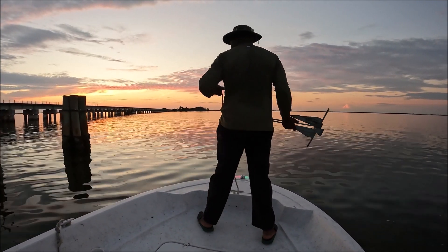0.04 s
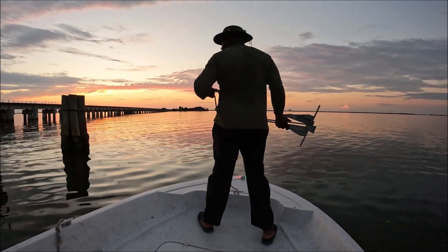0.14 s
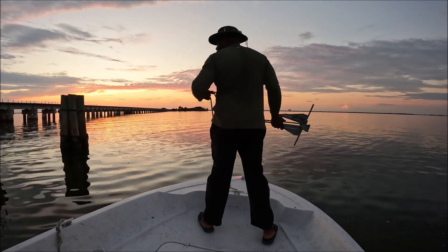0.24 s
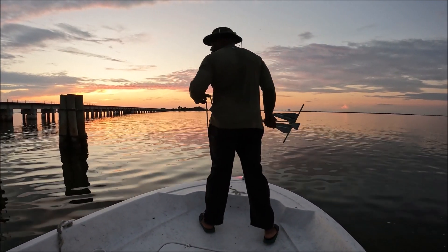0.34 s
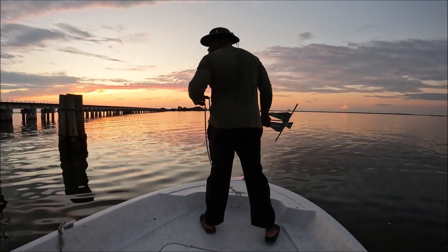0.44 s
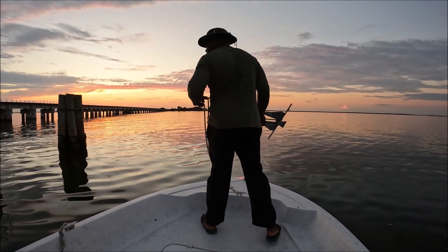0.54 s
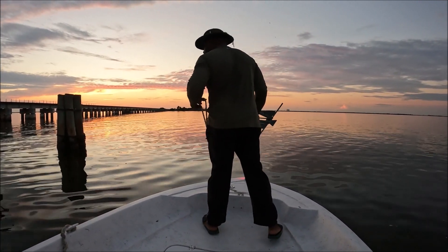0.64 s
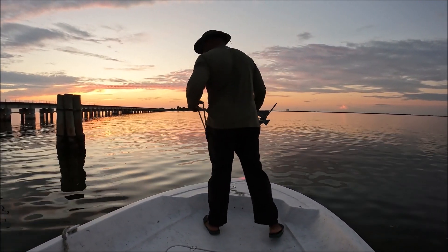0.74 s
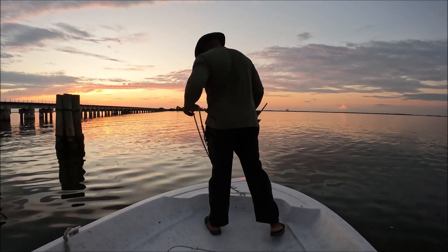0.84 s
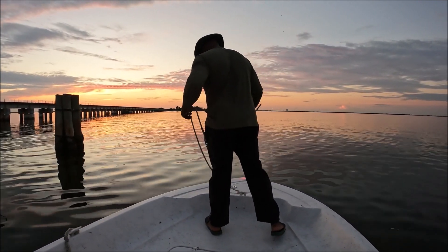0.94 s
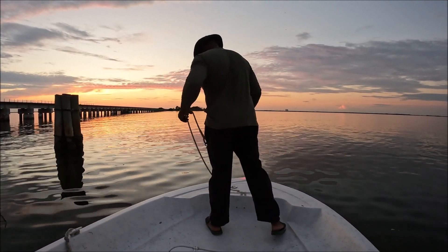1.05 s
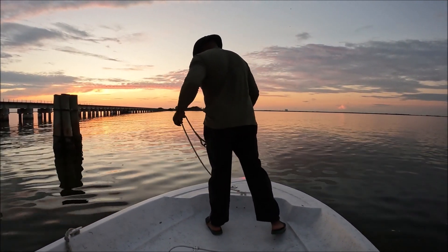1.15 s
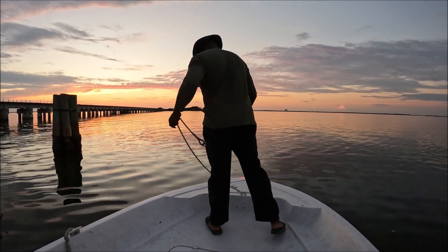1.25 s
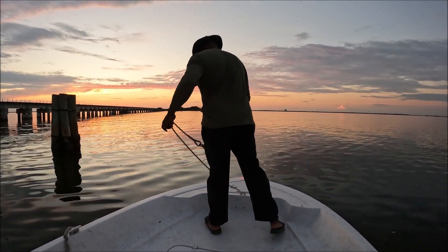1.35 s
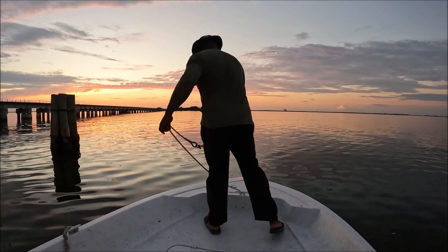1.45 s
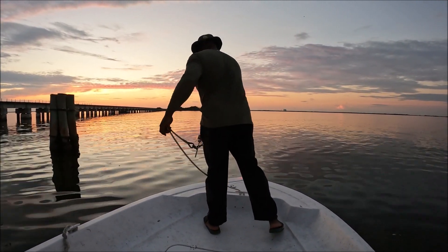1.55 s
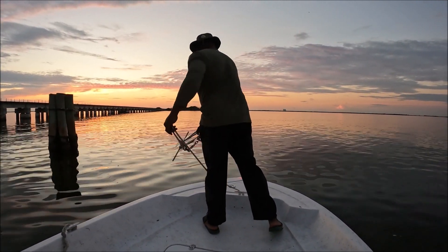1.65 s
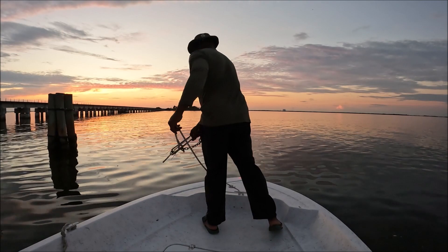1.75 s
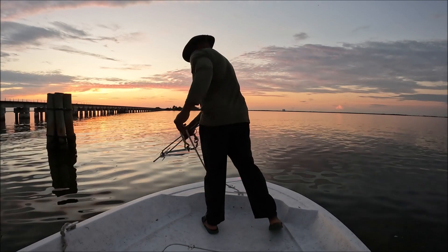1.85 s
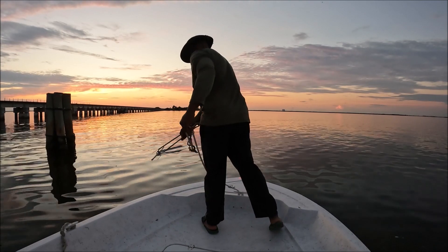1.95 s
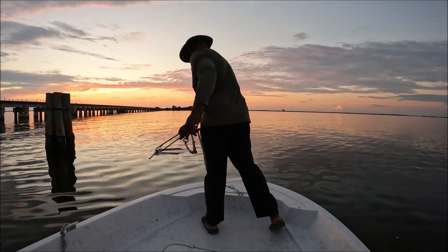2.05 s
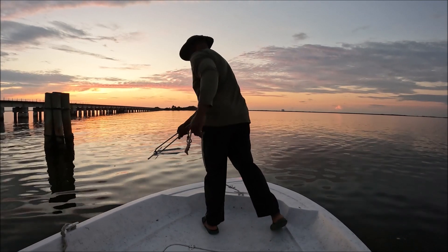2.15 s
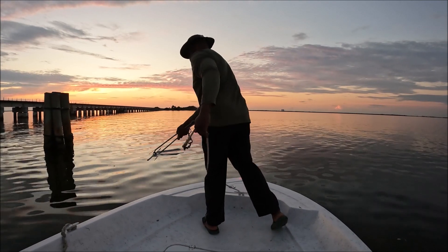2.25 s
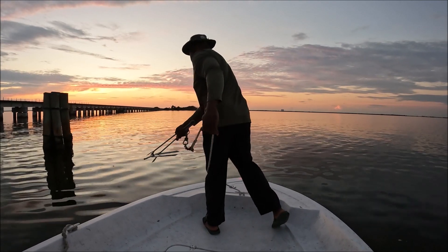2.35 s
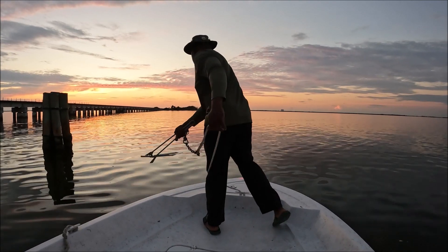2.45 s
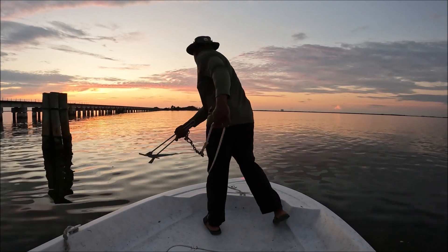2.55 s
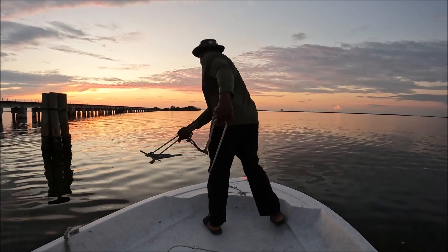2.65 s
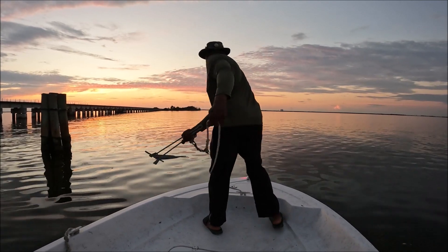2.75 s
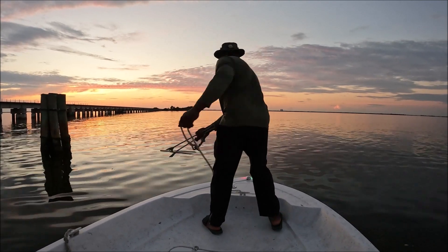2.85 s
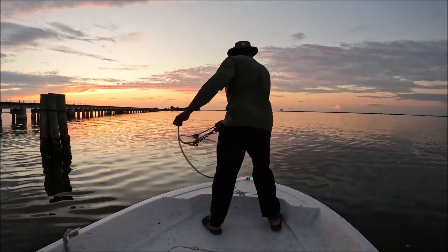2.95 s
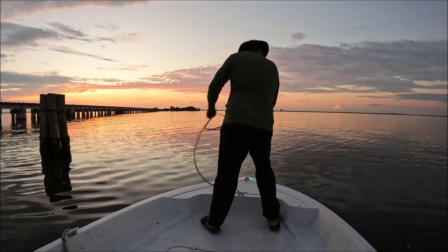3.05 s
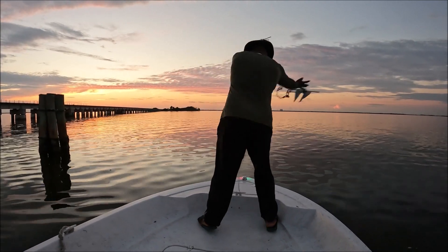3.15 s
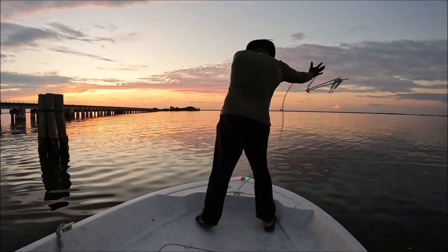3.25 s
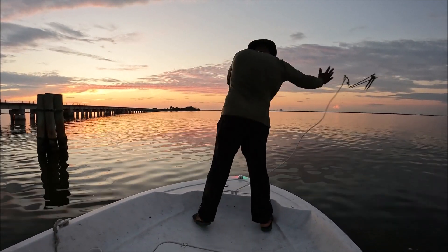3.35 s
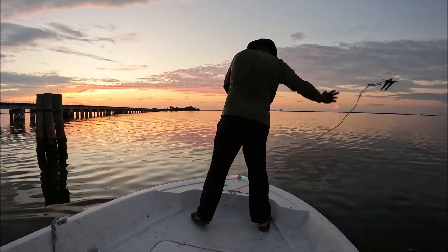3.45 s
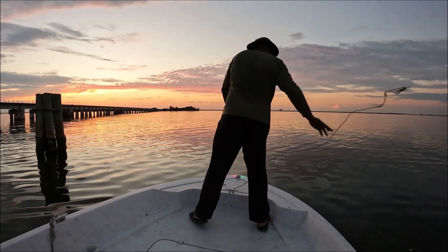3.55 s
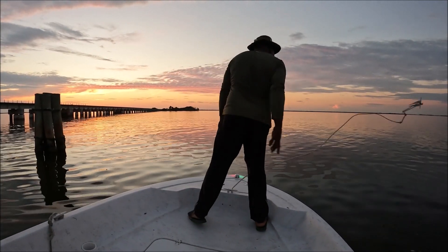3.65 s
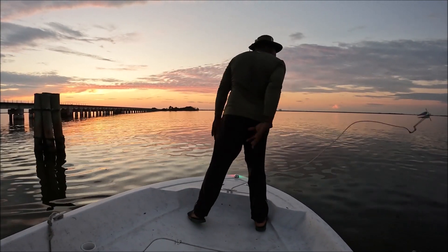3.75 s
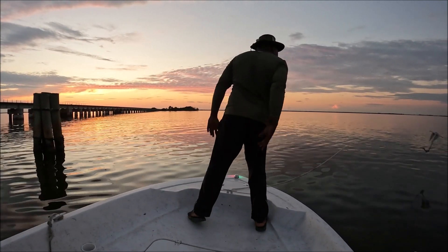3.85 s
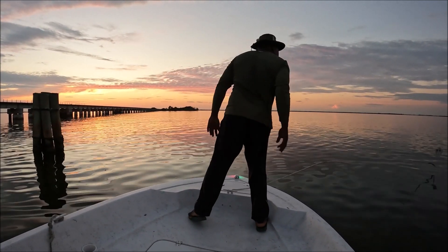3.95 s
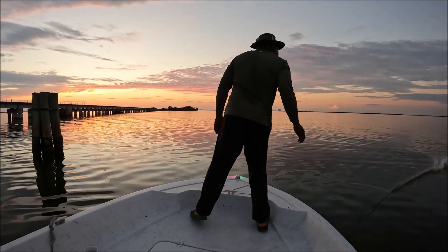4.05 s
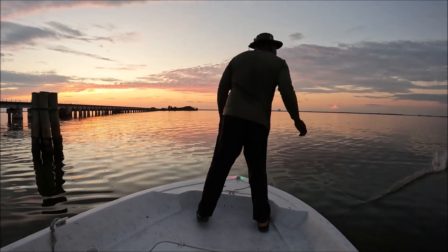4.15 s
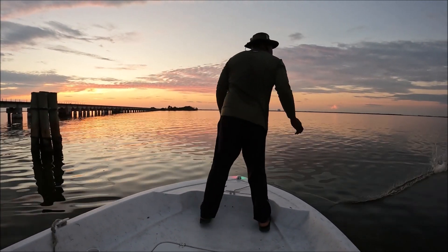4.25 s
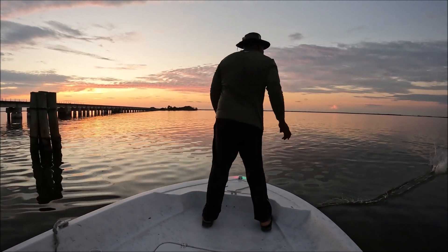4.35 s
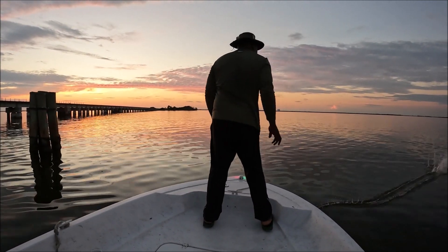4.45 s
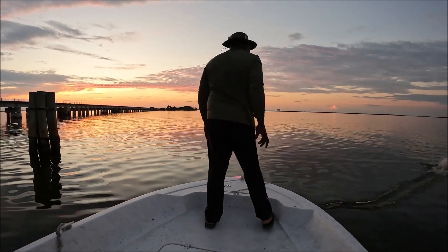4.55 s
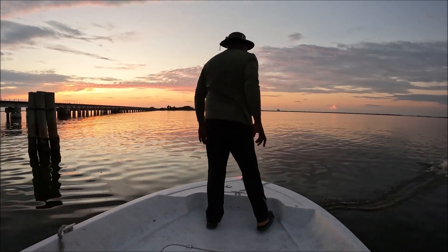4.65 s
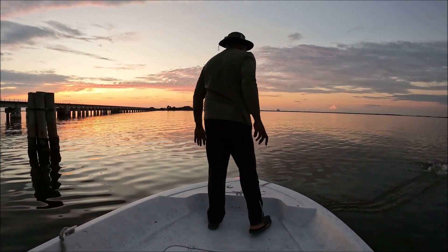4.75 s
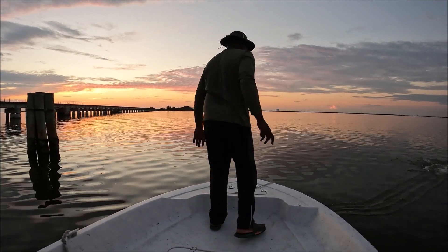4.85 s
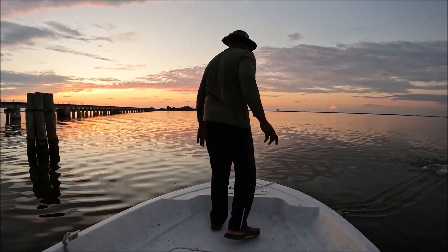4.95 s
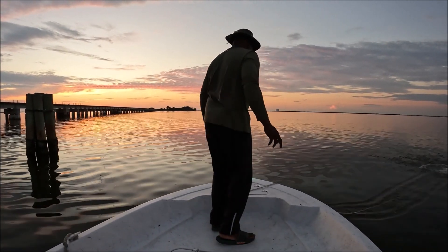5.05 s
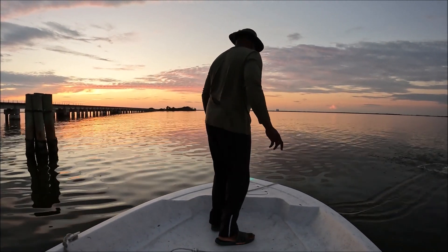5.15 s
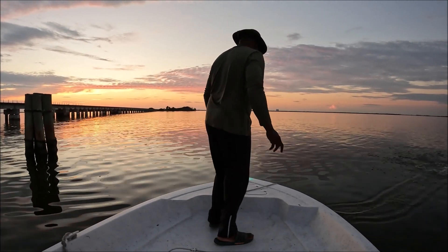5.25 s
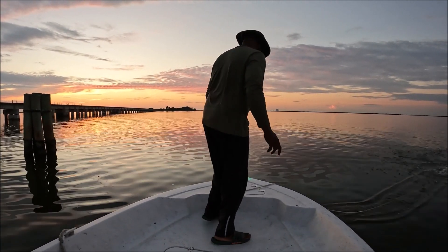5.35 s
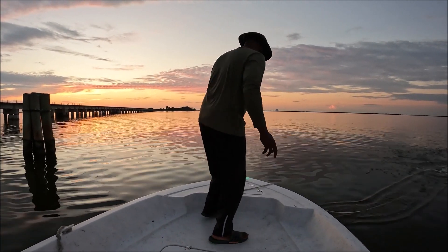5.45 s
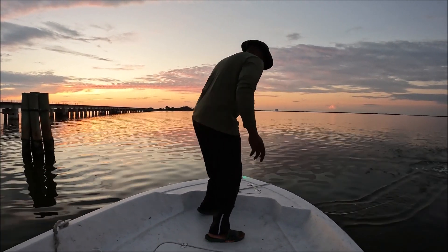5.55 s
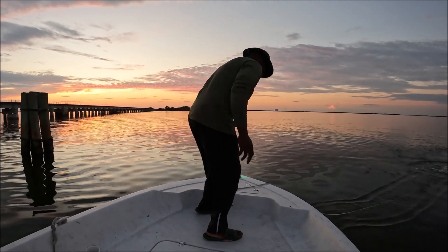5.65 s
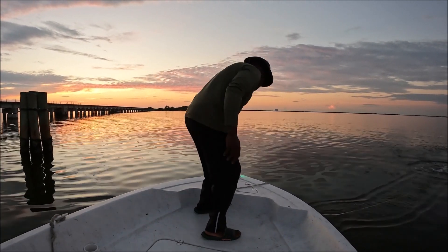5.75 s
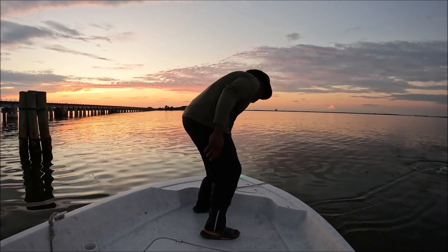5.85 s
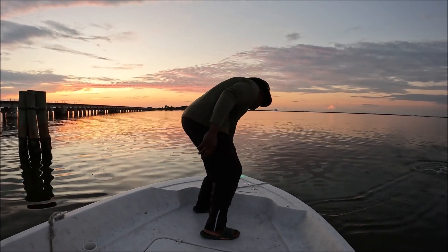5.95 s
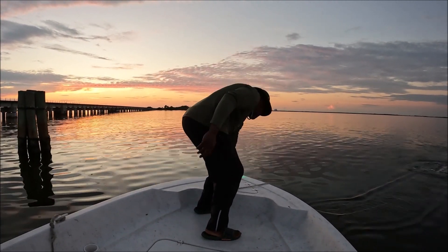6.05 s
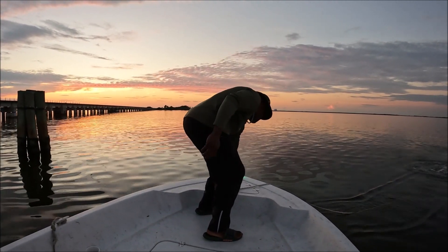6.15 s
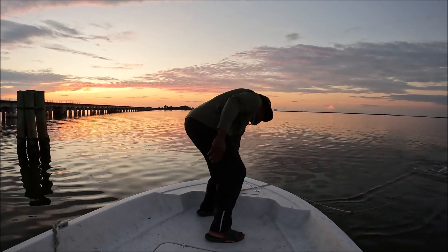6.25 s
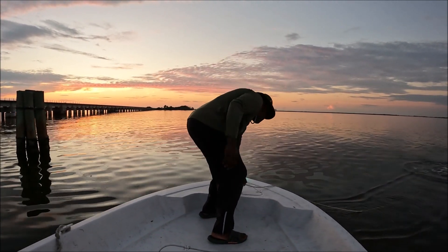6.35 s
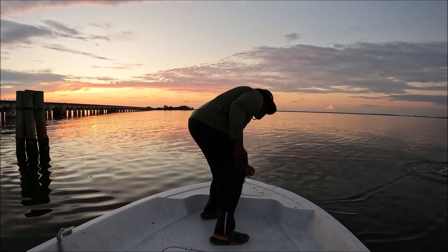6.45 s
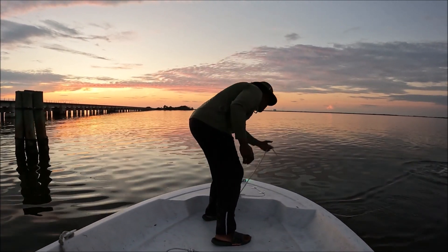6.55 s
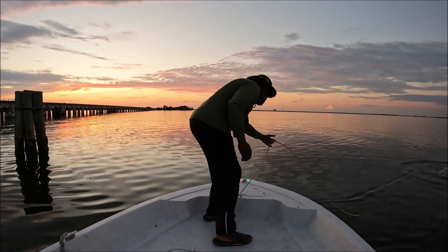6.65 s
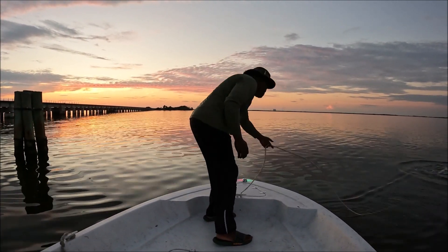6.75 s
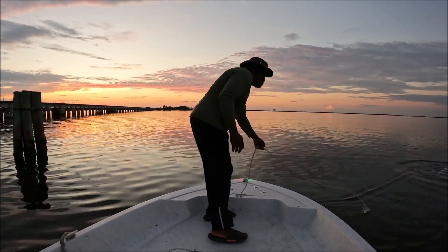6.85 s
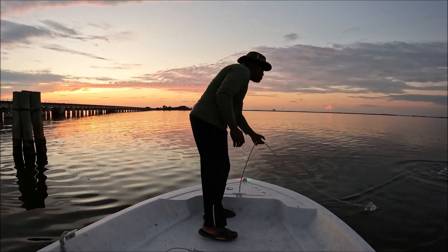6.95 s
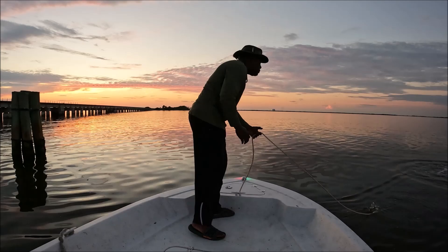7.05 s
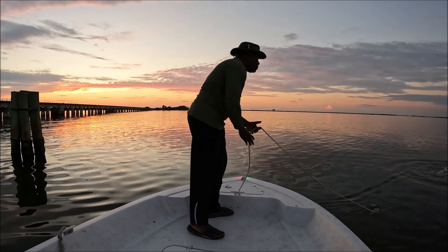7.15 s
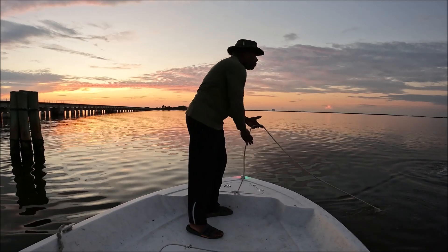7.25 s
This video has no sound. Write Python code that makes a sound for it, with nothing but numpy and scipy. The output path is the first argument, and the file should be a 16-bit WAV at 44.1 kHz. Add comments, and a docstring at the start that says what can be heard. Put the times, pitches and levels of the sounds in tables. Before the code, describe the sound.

An outboard motor idles over a low rumble and faint hiss on a calm bay. A crow caws twice far off. Nearby, rope swishes softly and chain clanks against a steel anchor. The chain jingles as it is thrown, with feet and line thumping the hollow deck, then the anchor splashes in. Spray patters back and the water settles, leaving a few soft knocks and small splashes.

```python
"""An anchor and its chain, thrown by a man from the bow of a small fibreglass boat, plunge into calm water.
The chain clanks on the flukes and jingles in flight as rattling contacts ring the steel; feet and line
thump the hollow deck. The splash is clouds of ringing bubbles, then spray raining back, and at the end
the lifted line flicks the water. Behind it the outboard's firing harmonics hum at idle over a low
rumble and the hiss of the bay, and a crow caws twice far off."""
import sys
import numpy as np
from scipy import signal
from scipy.fft import rfft, irfft, next_fast_len
from scipy.io import wavfile
from scipy.ndimage import map_coordinates

SR = 44100
rng = np.random.default_rng(int(sys.argv[2]) if len(sys.argv) > 2 else 0)


def int16_out(signal):
    """Quantize to a 16-bit WAV file."""
    q = np.round(np.clip(np.atleast_2d(signal).T, -1, 1) * 32767)
    wavfile.write(sys.argv[1], SR, q.astype(np.int16))


N = 322371
TIME = np.arange(N) / SR
THROW_S, PLUNGE_S = 3.22, 4.177


def from_db(db):
    return 10 ** (np.asarray(db) / 20)


def rms_one(x):
    return x / np.sqrt(np.mean(x ** 2) + 1e-20)


def at_hz(points, hz):
    """A spectrum read on a log-frequency axis."""
    points_hz, points_db = np.transpose(points)
    return np.interp(np.log(hz + 1e-9), np.log(points_hz), points_db)


def band(x, low_hz, high_hz, order=3):
    """Causal band-pass."""
    sos = signal.butter(order, [low_hz, min(high_hz, .45 * SR)], "band", fs=SR, output="sos")
    return signal.sosfilt(sos, x + 1e-18)


def coloured(x, spectrum):
    """Shapes x with an EQ curve; rms 1."""
    size = next_fast_len(x.shape[-1])
    gain = from_db(at_hz(spectrum, np.arange(size // 2 + 1) * SR / size))
    gain[0] = 0
    return rms_one(irfft(rfft(x, size) * gain, size)[..., :x.shape[-1]])


def drift(rate_hz):
    """Smooth random wandering; rms 1."""
    pole = np.exp(-80 * np.pi * rate_hz / SR)
    noise = rng.standard_normal(N // 40 + 2002)
    slow = signal.lfilter([1], [1, -2 * pole, pole * pole], noise)[2000:]
    return np.interp(np.arange(N) / 40, np.arange(len(slow)), rms_one(slow))


def swell(peak_s, attack_s, release_s, hold_s=0):
    """An envelope that grows to 1, holds and dies away."""
    before = np.maximum(peak_s - TIME, 0) / attack_s
    after = np.maximum(TIME - peak_s - hold_s, 0) / release_s
    return np.exp(-np.minimum(before + after, 20))


def add(track, start_s, sound):
    """Mixes a sound into a track."""
    start = max(round(start_s * SR), 0)
    track[start:start + len(sound)] += sound[:N - start]


def grains(per_s, spread_db, size):
    """Random clicks of uneven strength."""
    strength = from_db(spread_db * np.minimum(rng.exponential(1, size), 4.5))
    return strength * rng.choice([-1, 1], size) * (rng.random(size) < per_s / SR)


def voiced(sound, edges_hz, levels_db):
    """Balances a hit's bands by the level of their first 20 ms."""
    parts = [band(sound, low, high) for low, high in zip(edges_hz, edges_hz[1:])]
    return sum((-1) ** k * from_db(db) * part / (np.std(part[:SR // 50]) + 1e-12)
               for k, (part, db) in enumerate(zip(parts, levels_db)))


def ringing(modes):
    """One dying sine for each mode."""
    t = TIME[:SR // 2]
    hz, mode_db, t60_s = np.transpose(modes)[:, :, None]
    return from_db(mode_db - 60 * t / t60_s) * np.sin(2 * np.pi * hz * t)


def struck(rings, favour_db):
    """Each blow shares its force among the modes in its own way; all its contacts ring them alike."""
    shares = from_db(favour_db + rng.normal(0, 0.87, len(rings))) * rng.choice([-1, 1], len(rings))
    body = shares @ rings
    return body / np.std(body[:SR // 100])


def push_db(contacts, hz):
    """How hard a rattle drives each frequency; evening this out lets a body keep its tone on every blow."""
    push = np.abs(rfft(contacts))[np.round(hz * len(contacts) / SR).astype(int)]
    return 20 * np.log10(push / np.linalg.norm(contacts) + .2)


def blows(rows, modes, edges_hz, bounces_per_s, bounce_db, crack_db, crack_t60_s, attack_s,
          held_until_s=0):
    """Each blow is a contact and a dying rattle that ring the modes, over a short crack."""
    t, out = TIME[:SR // 2], np.zeros(N)
    rings, mode_hz = ringing(modes), np.array(modes)[:, 0]
    for start_s, *levels_db, rattle_s, spot_hz, spot_db in rows:
        favour_db = spot_db * np.exp(-((mode_hz - spot_hz) / 18) ** 2)   # the spot hit favours a mode
        crack = band(rng.standard_normal(len(t)), 180, 7600, order=1)
        crack *= from_db(crack_db - 60 * t / crack_t60_s)
        contacts = from_db(bounce_db) * grains(bounces_per_s, 1.0, len(t)) * np.exp(-t / rattle_s)
        contacts[0] = 2   # the first touch is the hardest
        body = struck(rings, favour_db - push_db(contacts, mode_hz))
        if start_s < held_until_s:
            body *= from_db(-130 * t)   # damped while bunched in the hand
        sound = signal.fftconvolve(body + crack, contacts)[:len(t)] * (1 - np.exp(-t / attack_s))
        add(out, start_s, voiced(sound, edges_hz, levels_db))
    return out


def wide(spectrum, side_db):
    """Steady stereo noise from a mid and a side signal."""
    mid, side = coloured(rng.standard_normal((2, N)), spectrum)
    return mid + from_db(side_db) * side * [[1], [-1]]


def placed(x, left_lag_ms, scatter_db):
    """A source near the centre, with reflections from deck and water that differ between the ears."""
    t = TIME[:SR // 10]
    scatter = band(rng.standard_normal(len(t)), 870, 9700, order=1) * np.exp(-t / 0.0082)
    side = from_db(scatter_db) * signal.fftconvolve(x, scatter / np.linalg.norm(scatter))[:N]
    left = map_coordinates(x, [np.arange(N) - left_lag_ms * SR / 1000], order=3)
    return np.array([left, x]) + side * [[1], [-1]]


# EQ of the low bed: freq_hz, gain_db
RUMBLE_EQ = [(12, 1.5), (22, -4.5), (45, -13.5), (69, -3), (90, -4.5), (115, -12.5), (170, -18.5),
             (260, -24), (340, -31), (450, -38), (700, -50)]
# EQ of the airy bed: freq_hz, gain_db
HISS_EQ = [(260, -4.5), (450, -2), (723, -6.5), (814, -16.5), (1310, -1), (1860, -11.5), (2620, -15.5),
           (2820, -13), (4210, -25), (6970, -19), (8570, -28), (12400, -31.5), (15500, -71)]
def bay():
    """The low rumble of hull and air under the far hiss of the bay."""
    rumble = from_db(-30.5) * band(wide(RUMBLE_EQ, side_db=-17), 6.9, 950, order=2)
    hiss = from_db(-58.5) * wide(HISS_EQ, side_db=-1.5)
    return rumble + hiss


# Tone of the idle: harmonic_number, gain_db
IDLE_HARMONICS = [(2, 1), (3, -27.5), (4, -3.5), (5, -4), (6, -3.5), (7, -11), (9, -14.5), (10, -21.5),
                  (11, -18.5), (12, -30), (13, -27), (15, -31)]
# Fader ride on the hum: time_s, level_db
IDLE_FADER = [(0, -38), (1.2, -38.5), (2.0, -35.5), (3.8, -33.5), (5.0, -39), (7.3, -41)]
def outboard(firing_hz=32.01):
    """Firing harmonics at a nearly steady idle, each wavering in strength."""
    phase = 2 * np.pi * np.cumsum(firing_hz * (1 + 0.00193 * drift(1.6))) / SR
    hum = sum(from_db(db + 1.5 * drift(2.25)) * np.sin(k * phase + rng.uniform(0, 2 * np.pi))
              for k, db in IDLE_HARMONICS)
    return from_db(np.interp(TIME, *np.transpose(IDLE_FADER))) * rms_one(hum)


# Nasal formants of the throat: freq_hz, gain_db
THROAT_EQ = [(600, -36), (1050, -16), (1400, -1), (1680, -2), (2100, -17), (2900, -32), (3700, -30),
             (4350, -23), (4900, -34), (5550, -20), (5950, -27), (6400, -21), (8000, -42)]
# Caws, sagging either side of the peak: peak_s, top_pitch_hz, gain_db, sag_octaves, release_s
CAW_CUES = [(0.332, 350, -44.5, .32, .064), (.53, 292.6, -46.5, .17, .057)]
def crow(attack_s=0.048):
    """Two arched notes: rough harmonics slide through throat resonances and echo off the bridge."""
    call, out = np.zeros(SR), np.zeros(N)
    for peak_s, top_hz, gain_db, sag_octaves, release_s in CAW_CUES:
        t = TIME[:SR] - peak_s
        arch = np.minimum(np.abs(t) / release_s, 2) ** 1.3
        jitter = 1 + .012 * drift(100)[:SR]
        pitch_hz = top_hz * 2 ** (-sag_octaves * arch) * jitter
        phase = 2 * np.pi * np.cumsum(pitch_hz) / SR
        note = sum(from_db(at_hz(THROAT_EQ, k * pitch_hz)) * np.sin(k * phase + rng.uniform(0, 2 * np.pi))
                   for k in range(2, 27))
        rasp_db = 2.2 * drift(76)[:SR]
        envelope = np.exp(-(t / np.where(t < 0, attack_s, release_s)) ** 2)
        call += note * from_db(gain_db + rasp_db) * envelope
    add(out, 0, call)
    add(out, .065, from_db(-18) * band(call, 1100, 1740))
    return out


# Rope swishes on the gather and the backswing: peak_s, level_db, swell_s
SLIDE_CUES = [(1.272, -51.5, 0.012), (1.59, -59, 0.027), (2.853, -48, .022)]
def rope_slide(band_hz=(1700, 5000)):
    """Brief hisses of rope through the palm, and faint uneven rustling of its fibres."""
    hiss = rms_one(band(rng.standard_normal(N), *band_hz, order=2))
    fibres = rms_one(band(grains(per_s=700, spread_db=4.5, size=N), *band_hz, order=1))
    grip = sum(from_db(db) * swell(peak_s, swell_s, swell_s) for peak_s, db, swell_s in SLIDE_CUES)
    return grip * hiss + from_db(-71.5 + drift(9.6)) * fibres


# Spot ticks of line, links and drops: start_s, level_db, centre_hz
TICK_CUES = [(0.049, -48.5, 2360), (0.673, -48.5, 2480), (0.882, -49.5, 5170), (1.048, -54, 6900),
             (3.142, -38.5, 2690), (3.54, -32, 5640), (4.296, -31, 5340), (4.702, -29.5, 3040),
             (5.328, -41, 6300), (5.356, -38, 2510), (5.693, -45, 2160), (5.776, -48, 2280),
             (5.873, -52.5, 2060)]
def ticks(decay_cycles=26):
    """Tiny dry contacts, each a broad band of noise; the higher ones are shorter."""
    t, out = TIME[:SR // 10], np.zeros(N)
    for start_s, level_db, hz in TICK_CUES:
        noise = rms_one(band(rng.standard_normal(len(t)), hz / np.sqrt(3), hz * np.sqrt(3), order=2))
        add(out, start_s, from_db(level_db) * noise * np.exp(-t * hz / decay_cycles))
    return out


def line_bumps(count, growth_db_per_s=14.5):
    """Thump cues for loops of line crossing the bow unevenly, harder as the line gathers speed."""
    offset, strength = rng.uniform(-.5, .5, (count, 2)).T
    after_s = (np.arange(count) + .5 + .5 * offset) / count * (PLUNGE_S - THROW_S)
    boom_db = -45 + growth_db_per_s * after_s + 4 * strength
    return [(THROW_S + s, db, -16, 0, 0) for s, db in zip(after_s, boom_db)]


# Ring of the foredeck panels: pitch_hz, gain_db, t60_s
PANEL_MODES = [(140.3, 3, 0.11), (216, 0, 0.16), (238, 1, 0.15), (295.7, 3, 0.08), (347.5, -5, 0.06),
               (408.5, -14, 0.08), (530, -6, 0.045), (660, -1, 0.024), (783, -7, 0.03), (915, 5, 0.024),
               (1250, -9, 0.041), (1706, -4, 0.015)]
# Thumps of feet and coils of line: start_s, boom_db, knock_above_boom_db, panel_hz
THUMP_CUES = [(0.409, -47.5, -8.5, 347), (1.624, -36, -28, 296), (3.11, -46.5, -4, 140),
              (3.243, -32.5, -24, 296), (3.283, -32, -20, 296), (3.515, -36, -31, 140),
              (3.648, -34, -1, 296), (3.694, -19.5, -8.5, 238), (3.746, -27.5, -10, 296),
              (3.789, -37.5, -26, 296), (3.864, -30.5, -20, 216), (3.925, -30.5, -15.5, 140),
              (4.055, -32.5, -11, 296), (4.103, -28, -6.5, 238), (5.145, -37.5, -19, 216),
              (5.691, -38, -18, 238), (6.676, -31.5, -18.5, 236), (7.17, -38.5, -21, 216)]
def deck(panel_boost_db=3.5, thump_scuff_s=0.022, bump_scuff_s=0.072):
    """Soft blows on the hollow foredeck; harder ones add a knock and a tap to the boom."""
    hits = [(*cue, panel_boost_db, thump_scuff_s) for cue in THUMP_CUES]
    hits += [(*cue, bump_scuff_s) for cue in line_bumps(count=12)]
    rows = []
    for start_s, boom_db, hardness_db, *spot, scuff_s in hits:
        knock_db = boom_db + hardness_db
        tap_db = knock_db - 7.5
        rows.append((start_s, boom_db, knock_db, tap_db, scuff_s, *spot))
    thumps = blows(rows, PANEL_MODES, (140, 450, 1200, 3500), bounces_per_s=600, bounce_db=-5.5,
                   crack_db=-6, crack_t60_s=0.08, attack_s=.002)
    return from_db(2.0) * thumps


# EQ of splashing water: freq_hz, gain_db
WATER_EQ = [(200, 31.5), (400, 12), (900, 8.5), (2000, -9.5), (3200, -19), (6500, -26.5), (9000, -35),
            (12500, -39), (15500, -49)]
def bubbling(per_s, spread_db, cycles, hiss_db, size):
    """Bubbles of all sizes, each ringing a few cycles, over the hiss of those too small to tell apart."""
    clicks, out = grains(per_s, spread_db, size), np.zeros(size)
    size_class = rng.integers(0, 36, size)
    for k, hz in enumerate(np.geomspace(280, 13000, 36)):
        pole = from_db(-60 * hz / (cycles * SR))
        resonator = [1, -2 * pole * np.cos(2 * np.pi * hz / SR), pole * pole]
        ring = signal.lfilter([1, 0, -1], resonator, clicks * (size_class == k) + 1e-18)
        out += np.sqrt(hz) * rms_one(ring)
    return coloured(rms_one(out) + from_db(hiss_db) * rng.standard_normal(size), WATER_EQ)


def patter(envelopes, from_s, drops_per_s, spread_db):
    """Drops fall on the water; large bubbles, small bubbles and fizz each follow their own envelope."""
    start = round(from_s * SR)
    end = min(start + 5 * SR // 2, N)
    drops = bubbling(drops_per_s, spread_db, cycles=16, hiss_db=-4, size=end - start)
    edges_hz, out = (330, 1200, 3000, 15000), np.zeros(N)
    for k, envelope in enumerate(envelopes):
        register = rms_one(band(drops, edges_hz[k], edges_hz[k + 1]))
        out[start:end] += (-1) ** k * envelope[start:end] * register
    return out


# Small splashes, bow wash, then the lifted line: peak_s, gain_db, brightness_db_per_band, swell_s
WASH_CUES = [(5.16, -48.5, -5, 0.011), (5.497, -43.5, -6.5, 0.021), (5.597, -58.5, -18.5, 0.037),
             (6.206, -54, -11, 0.021), (6.35, -66.5, -15, 0.041), (6.934, -69, 13, 0.034),
             (7.06, -54.5, -0.5, 0.03), (7.127, -51, 4.5, 0.018), (7.204, -50, 4, 0.026),
             (7.277, -52.5, -4.5, 0.012)]
def washes():
    """Each small splash swells and sinks; dull ones are mostly large bubbles, bright ones mostly fizz."""
    tilt = np.array([-1, 0, 1])
    envelopes = sum(np.outer(from_db(db + bright_db * tilt), swell(peak_s, swell_s, swell_s))
                    for peak_s, db, bright_db, swell_s in WASH_CUES)
    return from_db(1.5) * patter(envelopes, WASH_CUES[0][0] - .1, drops_per_s=1900, spread_db=2.0)


def bubble(hz, level_db, t60_s, rise_octaves):
    """A bubble's note rises as it nears the surface, by rise_octaves in half its t60."""
    t = TIME[:round(min(t60_s, .2) * SR)]
    turns = np.cumsum(hz * 2 ** (rise_octaves * 2 * t / t60_s)) / SR
    return from_db(level_db - 60 * t / t60_s) * (1 - np.exp(-turns)) * np.sin(2 * np.pi * turns)


# Solo bubbles: start_s, pitch_hz, level_db, t60_s, rise_octaves
PLOP_CUES = [(4.361, 223, -11, 0.097, 0.45), (4.387, 537, -8, 0.025, 0.44), (4.782, 1380, -23, 0.023, 0.29),
             (5.588, 590, -27.5, 0.048, 0.25), (7.038, 1810, -27.5, 0.018, 0.95),
             (7.097, 3970, -35.5, 0.019, .2), (7.112, 1250, -30.5, 0.028, 0.12),
             (7.125, 970, -33.5, 0.062, 0.17), (7.255, 3407, -38, .025, 0.44)]
def plops():
    """The few bubbles that ring out alone."""
    out = np.zeros(N)
    for start_s, *note in PLOP_CUES:
        add(out, start_s, bubble(*note))
    return out


# Gurgles from the anchor's cavity, the falling spray and the wash:
# start_s, length_s, bubbles_per_s, first_pitch_hz, last_pitch_hz, level_db
GURGLE_CUES = [(4.187, 0.041, 680, 2040, 1550, -24.5), (4.196, 0.052, 380, 843, 690, -22.5),
               (4.23, 0.04, 430, 1240, 1150, -30.5), (4.278, 0.075, 173, 606, 333, -28),
               (4.415, 0.097, 195, 735, 703, -34.5), (4.55, 0.48, 170, 1380, 1510, -36.5),
               (4.951, 0.59, 70, 2200, 1670, -45.5), (5.479, 0.15, 150, 750, 850, -47)]
def gurgles(max_bubbles=120, spread_octaves=.55, uneven_db=7, ring_cycles=32, rise_octaves=.12):
    """Bubble swarms swell and sink; their pitch falls where trapped air comes in ever larger pockets."""
    out = np.zeros(N)
    for start_s, length_s, per_s, first_hz, last_hz, swarm_db in GURGLE_CUES:
        offset, detune, strength, rise = rng.uniform(-1, 1, (max_bubbles, 4)).T
        progress = (np.arange(max_bubbles) + 1 + offset) / (per_s * length_s)
        hz = first_hz * (last_hz / first_hz) ** progress * 2 ** (spread_octaves * detune)
        for k in np.flatnonzero(progress < 1):
            arch_db = 10 * np.log10(np.sin(np.pi * progress[k]) + 1e-3)
            level_db = swarm_db + uneven_db * strength[k] + arch_db
            note = bubble(hz[k], level_db, ring_cycles / hz[k], rise_octaves * (1 + rise[k]))
            add(out, start_s + length_s * progress[k], note)
    return out


# Spray around its main landing; rows are large bubbles, small bubbles and fizz:
# landing_db, rise_db_per_s, loss_after_one_s_db
SPRAY_ENVELOPES = [(-42.5, -7, 18), (-43.5, 18, 45), (-43.5, 13.5, 20)]
def spray(flight_s=0.58, churn_db=(-32.5, -50, -43)):
    """The churned water settles while the thrown-up drops rain back, then thin out ever faster."""
    late_s = TIME - PLUNGE_S - flight_s
    before_s, after_s = np.maximum(-late_s, 0), np.maximum(late_s, 0)
    shape = dict(peak_s=PLUNGE_S + 0.052, attack_s=0.0075, release_s=0.15)
    churn, raining = swell(**shape), swell(**shape, hold_s=2.17)
    envelopes = []
    for (landing_db, rise_db_per_s, loss_db), db in zip(SPRAY_ENVELOPES, churn_db):
        rain = raining * from_db(landing_db - rise_db_per_s * before_s - loss_db * after_s ** 1.52)
        envelopes.append(np.hypot(rain, from_db(db) * churn))
    return from_db(-1.0) * patter(envelopes, PLUNGE_S, drops_per_s=3200, spread_db=1.3)


# EQ of the steel's shimmer: freq_hz, gain_db
STEEL_EQ = [(700, -6), (1400, -5.5), (2200, 15), (3300, 10), (5200, 15.5), (7500, 15), (8600, 4.5),
            (10500, 5.5), (13000, -5), (15500, -48)]
def overtones(gain_db, t60_at_4khz_s, count):
    """Dense, unevenly spaced modes of steel plates and links; the higher ones die sooner."""
    offset, damping = rng.uniform(-0.98, 1, (count, 2)).T
    hz = np.linspace(850, 15000, count) + offset * 14000 / count
    t60_s = t60_at_4khz_s * (4000 / hz) ** 0.4 * 2 ** (.5 * damping)
    return np.column_stack([hz, gain_db + at_hz(STEEL_EQ, hz), t60_s])


def chain_rustle(modes, links=8, growth_db_per_s=9.5):
    """The bundle whips out of the hand, then light touches grow as more of the chain is in the air."""
    whip = from_db(-26) * swell(3.332, attack_s=0.016, release_s=0.034, hold_s=0.042)
    airborne = swell(THROW_S, attack_s=.01, release_s=0.034, hold_s=PLUNGE_S - THROW_S)
    flight = from_db(-57 + growth_db_per_s * (TIME - THROW_S)) * airborne
    force = (whip + flight)[round(THROW_S * SR):][:3 * SR // 2]
    rings, out = ringing(modes)[:, :SR // 10], np.zeros(N)
    for _ in range(links):
        damped = struck(rings, 0) * np.exp(-TIME[:SR // 10] / 0.012)   # neighbours damp each other
        touches = rms_one(grains(per_s=220, spread_db=4.2, size=len(force))) * force
        add(out, THROW_S, signal.fftconvolve(touches, damped / np.linalg.norm(damped)))
    return out


# Ring of chain and shackle: pitch_hz, gain_db, t60_s
LINK_MODES = [(1046, -12, .7), (1684, -8, .8), (1890, -5, .2), (2115, -7, .5), (2170, -8, .3),
              (2475, -9, .35), (2535, -7, .5), (2780, -7, .3), (3273, -4, .22), (3725, -2, .4),
              (4087, 6, .19), (4430, -6, .3), (4620, -4, .22), (5345, -1, .4), (5438, 4, .17),
              (5895, -4, .22), (6400, -6, .35), (6730, -1, .4), (6907, -2, .3), (7235, -2, .28),
              (7440, -1, .2), (9690, 0, .25)]
# Jingles as the chain runs out: start_s, gain_db, extra_treble_db, accent_hz, accent_db
JINGLE_CUES = [(3.221, -40, -2, 2780, 6), (3.305, -36, 0, 3273, 8), (3.324, -29.5, 10, 4087, 11),
               (3.351, -32, 10.5, 5438, 9), (3.421, -50, 12, 7235, 9), (3.468, -50, 14, 6400, 9),
               (3.588, -40, 7, 6730, 7), (3.66, -53, 8, 5345, 18), (3.755, -48, 0, 2535, 15),
               (3.795, -52, 12, 6907, 9), (3.882, -37, -9, 1890, 10), (3.905, -40, -8, 2115, 9),
               (3.951, -44, 7, 6730, 7), (3.975, -44, -10, 1684, 17), (4.085, -41, -9, 2780, 18),
               (4.103, -36, -6, 2170, 12), (4.136, -38, -2, 4087, 9)]
def chain(bass_db=-7.5):
    """Light links snap together in the air, over their rustle; harder snaps rattle longer."""
    modes = np.vstack([LINK_MODES, overtones(gain_db=-9.5, t60_at_4khz_s=.11, count=150)])
    rows = []
    for start_s, db, treble_db, *accent in JINGLE_CUES:
        rattle_s = .012 * 2 ** ((db + 40) / 12)
        rows.append((start_s, db + bass_db, db, db + treble_db, rattle_s, *accent))
    snaps = blows(rows, modes, (700, 1500, 3800, 14000), bounces_per_s=750, bounce_db=-3,
                  crack_db=-7, crack_t60_s=.028, attack_s=.0028, held_until_s=3.4)
    return from_db(-1.0) * snaps + from_db(-9.5) * chain_rustle(modes)


# Ring of flukes and stock: pitch_hz, gain_db, t60_s
FLUKE_MODES = [(940, 3, .12), (1057, 9, .23), (1073, 0, .2), (1717, 0, .26), (1828, 1, .22), (2009, 0, .32),
               (2155, 7, .12), (2295, 3, .14), (2488, 0, .32), (2555, 5, .12), (2815, -11, 1.0),
               (3143, -2.5, .38), (3359, -3, .25), (3545, -1, .22), (3957, -5, .3), (4498, 7, .15),
               (4877, -5, .35), (5240, 2, .15), (5540, 1, .12), (5878, -1, .26), (6142, -2, .24),
               (6363, -2, .3), (6700, 0, .18), (7360, 0, .15), (7830, -2, .2), (9330, -6, .22)]
# Clanks of chain on anchor: start_s, low_db, mid_db, high_db, rattle_s, accent_hz, accent_db
CLANK_CUES = [(1.774, -68, -34, -34, 0.0062, 3143, 15), (1.792, -49, -27.5, -32.5, 0.0089, 2555, 17.5),
              (1.848, -32, -32.5, -27, 0.0049, 4498, 10.5), (1.9, -43, -53, -48, 0.04, 1057, -3),
              (1.972, -49, -54, -47, 0.016, 7380, 6), (1.992, -22.5, -26, -28, 0.018, 1057, -2.5),
              (2.026, -32.5, -37, -40.5, 0.03, 2488, 11), (2.073, -57, -50, -43.5, 0.0045, 6700, 6),
              (2.133, -32, -32.5, -32.5, 0.018, 1828, 8.5), (2.169, -40.5, -42, -56, 0.0063, 2815, 1),
              (2.203, -47, -71, -61, 0.016, 5878, 1), (2.224, -67, -56, -56, 0.006, 6700, 4)]
def anchor():
    """The chain swings against the flukes and rings the steel."""
    modes = np.vstack([FLUKE_MODES, overtones(gain_db=-9.5, t60_at_4khz_s=.09, count=170)])
    clanks = blows(CLANK_CUES, modes, (740, 1500, 4000, 12500), bounces_per_s=750, bounce_db=-3.5,
                   crack_db=-3, crack_t60_s=0.022, attack_s=.003)
    return from_db(-1.16) * clanks


# Anchor and chain hit the water: start_s, large_bubbles_db, small_bubbles_db, fizz_db, decay_s
SLAP_CUES = [(4.176, -30, -31, -31, 0.023), (4.188, -20.5, -25, -33, 0.015), (4.255, -28, -36, -39, 0.04),
             (4.322, -26, -50, -53, 0.015), (4.387, -27, -46, -37.5, 0.025)]
def plunge():
    """Each slap on the surface drives under a cloud of bubbles that dies away."""
    t, out = TIME[:SR // 2], np.zeros(N)
    for start_s, *levels_db, decay_s in SLAP_CUES:
        cloud = bubbling(per_s=4900, spread_db=3.0, cycles=15, hiss_db=-4.5, size=len(t))
        envelope = (1 - np.exp(-t / .002)) * np.exp(-t / decay_s)
        add(out, start_s, voiced(cloud * envelope, (230, 1200, 3000, 15000), levels_db))
    return from_db(-1.5) * out


def scene():
    """Deck sounds and crow, with the flying chain and the water a touch right, over outboard and bay."""
    deck_and_crow = anchor() + deck() + ticks() + rope_slide() + crow()
    around = placed(deck_and_crow, left_lag_ms=0.0095, scatter_db=-10.5)
    water = plunge() + plops() + gurgles() + spray() + washes()
    ahead = placed(chain(), left_lag_ms=0.0041, scatter_db=-9.0)
    ahead += placed(water, left_lag_ms=0.0051, scatter_db=-8.5)
    return around + ahead * from_db([[-.4], [.4]]) + bay() + outboard()


def record(dry, cutoff_hz=15450):
    """A steep low-pass takes off the very top."""
    return signal.sosfilt(signal.ellip(10, .1, 80, cutoff_hz, fs=SR, output="sos"), dry)


dry = scene()
out = record(dry)
int16_out(out)
```